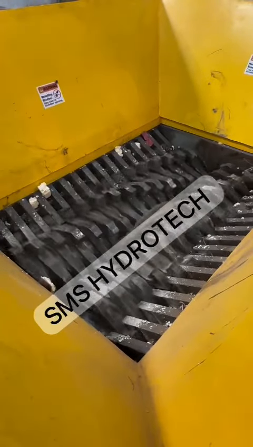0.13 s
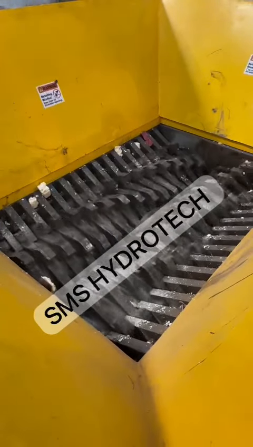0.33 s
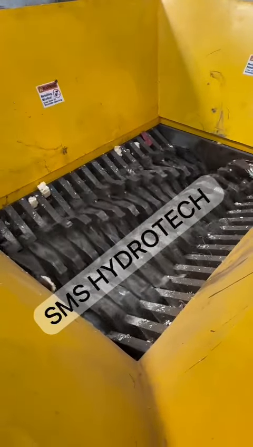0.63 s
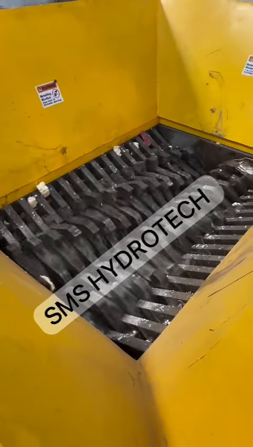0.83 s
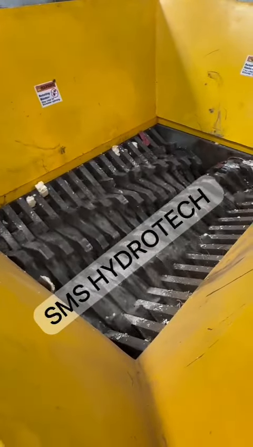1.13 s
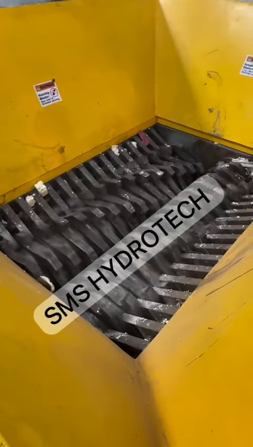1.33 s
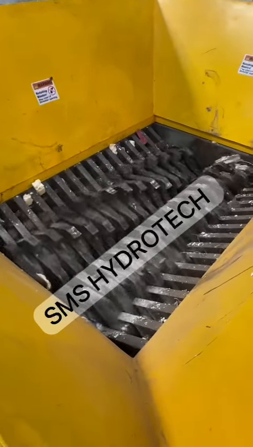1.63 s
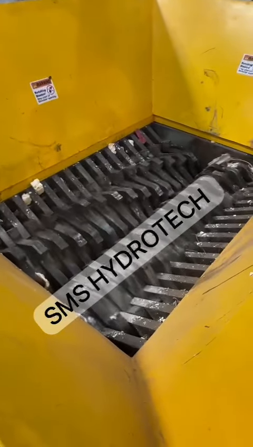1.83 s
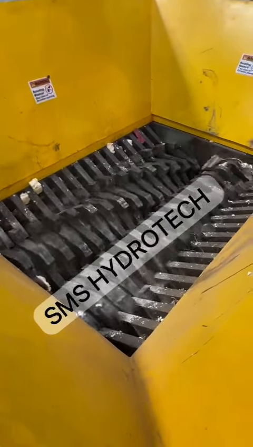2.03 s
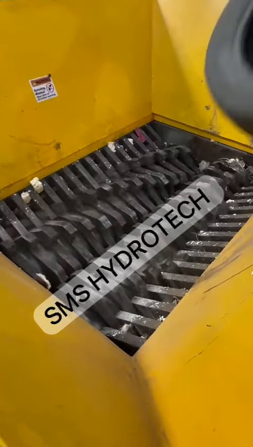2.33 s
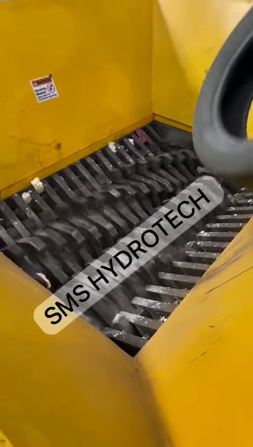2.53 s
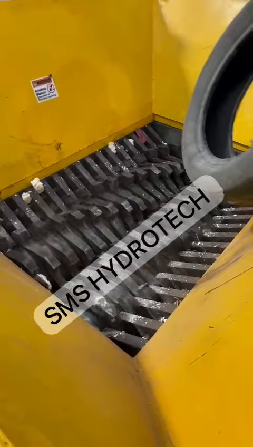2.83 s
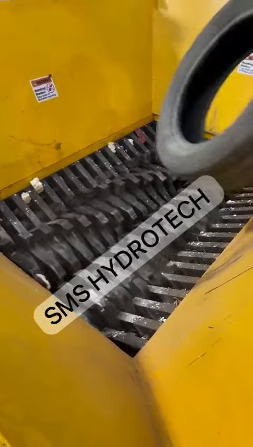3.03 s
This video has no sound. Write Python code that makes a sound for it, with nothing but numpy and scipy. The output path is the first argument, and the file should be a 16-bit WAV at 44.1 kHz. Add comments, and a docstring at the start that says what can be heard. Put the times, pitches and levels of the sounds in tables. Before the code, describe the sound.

A large industrial shredder hums and roars low throughout, with dull thuds. From 0 to about 0.85 s its blades crunch scrap in dense cracks and bright snaps. It then runs nearly empty, grinding crumbs, with a brief crack near 1.3 s, loose ringing rattles and tiny squeaks. From about 2.6 s to 3.2 s, hooks knock, scrape and rattle on a tyre. Close stereo pickup, short steel-hopper echoes, dulled extreme treble.

```python
"""Twin-shaft shredder in a steel hopper

At the bottom of the hopper the drive hums in gear tones and its noise roar throbs once a turn, with low thuds.
Blades crunch a last scrap, in noise, cracks and snaps, then run nearly empty, grinding on random crumbs.
Squeaks and bouncing bits pass by; then hooks knock and rattle on a tyre, in blows, gritty judder and rings.
The steel walls answer the cutters with dense echoes, and a two-port stereo microphone takes it all in."""
import sys
import numpy as np
from scipy import signal
from scipy.fft import rfft, irfft, next_fast_len
from scipy.io import wavfile

SR = 44100
rng = np.random.default_rng(int(sys.argv[2]) if len(sys.argv) > 2 else 0)


def pcm_store(signal):
    """Save signal as 16-bit PCM."""
    levels = np.round(np.clip(np.atleast_2d(signal), -1, 1) * 32767)
    wavfile.write(sys.argv[1], SR, levels.astype(np.int16).T)


N = 140679
T = np.arange(N) / SR
SIZE = 2 * next_fast_len(N * 5 // 8)  # transform length, with room beyond the end of the sound
HZ = np.arange(SIZE // 2 + 1) * SR / SIZE


def from_db(db):
    """Decibels to gain."""
    return 10 ** (np.asarray(db) / 20)


def rms_one(x):
    """Scale to rms 1."""
    return x / np.sqrt(np.mean(x ** 2) + 1e-20)


def in_time(rows):
    """Each column of a table after the first, joined over time."""
    start_s, *columns = np.transpose(rows)
    return [np.interp(T, start_s, column) for column in columns]


def over_hz(points):
    """A table joined on a log-frequency axis."""
    hz, value = np.transpose(points)
    return np.interp(np.log(HZ + 1), np.log(hz), value)


def drift(rate_hz):
    """Smooth chance with rms 1: noise whose spectrum falls away above the rate."""
    spectrum = rfft(rng.standard_normal(SIZE)) / (1 + (HZ / rate_hz) ** 2)
    return rms_one(irfft(spectrum)[:N])


def colour(x, spectrum):
    """Causal (minimum-phase) filter of the given shape that keeps the power of white noise."""
    cepstrum = irfft(np.log(rms_one(from_db(over_hz(spectrum)))))
    # Folding the cepstrum onto positive time makes the filter causal.
    cepstrum[1:SIZE // 2] *= 2
    cepstrum[SIZE // 2 + 1:] = 0
    response = np.exp(rfft(cepstrum))
    return irfft(rfft(x, SIZE) * response)[:N]


def grains(per_s, spread_db):
    """Random tiny fractures of uneven size and either sign; rms 1."""
    size_db = spread_db * np.minimum(rng.exponential(1, N), 4)
    sizes = from_db(size_db) * rng.choice([-1, 1], N)
    return rms_one(sizes * (rng.random(N) < per_s / SR))


def dying(start_s, t60_s):
    """An envelope that jumps to 1, falls 60 dB in t60_s and stops after twice that time."""
    out = np.zeros(N)
    span = slice(int(start_s * SR), int((start_s + 2 * t60_s) * SR))
    out[span] = from_db(-60 * (T[span] - start_s) / t60_s)
    return out


def swell(start_s, t60_s, rise_s):
    """An envelope that builds from nothing and dies away: a slow decay minus a fast one."""
    return dying(start_s, t60_s) - dying(start_s, rise_s)


def bursts(rows, t60_s):
    """Each contact is a very short run of tiny slips of random sign that builds and dies."""
    rise_s = 0.0034
    envelope = sum(from_db(level_db) * swell(start_s, t60_s, rise_s) for start_s, level_db, *_ in rows)
    return envelope * rng.choice([-1, 1], N)


def patchy(x, depth_db):
    """Contact points shift, so each half octave swells and fades on its own; the top band holds steady."""
    spectrum = rfft(x, SIZE)
    place = np.clip(2 * np.log2((HZ + 1) / 400), 0, 7)  # half octaves above 400 Hz
    bands = [irfft(spectrum * np.maximum(1 - abs(place - k), 0))[:N] for k in range(8)]
    return sum(band * from_db(depth_db * drift(45)) for band in bands[:-1]) + bands[-1]


def chips(per_s, spread_db):
    """Small fragments hit the steel at random, each with a short ring of one of 18 pitches; rms 1."""
    pitches = np.geomspace(575, 2490, num=18)  # Hz
    ring_cycles = 37  # cycles to fall 60 dB
    hits = grains(per_s, spread_db)
    dealt = rng.integers(0, len(pitches), N)
    out = 0
    for k, hz in enumerate(pitches):
        r = from_db(-60 * hz / (ring_cycles * SR))  # decay per sample
        w = 2 * np.pi * hz / SR
        struck = hits * (dealt == k) + 1e-18
        out = out + signal.lfilter([1, -r * np.cos(w)], [1, -2 * r * np.cos(w), r * r], struck)
    return rms_one(out)


# Modes of a struck piece. Columns: pitch_ratio [multiple of its pitch], level_db [dB]
PIECE_MODES = [(.61, -7), (.83, -10.5), (1, 0.5), (1.14, -9.5), (1.33, -10)]


def pieces(rows, t60_s):
    """Struck pieces ring briefly in a few modes around their pitch, swinging in alternate directions."""
    out = np.zeros(N)
    for start_s, level_db, *_, pitch_hz in rows:
        start = int(start_s * SR)
        t = T[:min(int(2 * t60_s * SR), N - start)]
        ring = 0
        for k, (pitch_ratio, mode_db) in enumerate(PIECE_MODES):
            ring = ring + (-1) ** k * from_db(mode_db) * np.sin(2 * np.pi * pitch_hz * pitch_ratio * t)
        out[start:start + len(t)] += from_db(level_db - 60 * t / t60_s) * ring
    return out


# Gear lines of the drive. Columns: multiple [of the turning rate], level_db [dB, before wavering]
HUM_LINES = [(2, -53), (3, -43), (4, -37.5), (5, -36.5), (7, -37), (8, -36.5), (10, -35.5), (11, -40.5),
             (12, -36), (14, -40.5), (15, -46), (16, -37.5), (17, -39.5), (18, -43), (24, -46), (35, -48)]
# Load on the frame, before the roar trim. Columns: start_s [s], level_db [dB]
ROAR_LOAD = [(0, -23.5), (.45, -25.5), (.8, -28), (1.05, -27.5), (1.28, -25), (1.55, -26.5), (1.72, -27.5),
             (1.95, -26), (2.15, -27), (2.42, -28), (2.65, -21.5), (2.85, -24.5), (3.02, -20.5),
             (3.19, -28)]
# Tone of the frame's roar, relative. Columns: freq_hz [Hz], level_db [dB per Hz]
ROAR_SPECTRUM = [(15, -51), (28, -36), (42, -25), (60, -12.5), (78, 0), (105, -2.5), (145, -1.5), (200, -6),
                 (275, -2.5), (350, -10), (600, -19.5), (1500, -28), (5000, -92)]


def drive():
    """Gear lines waver in level and phase over a roar that throbs once a turn; stereo."""
    turn = 2 * np.pi * 16.92 * T  # turning rate in Hz
    waver_db, wander_rad = -1, 0.14
    trim_db, throb_db, side_db = -2.5, -1, -27
    load_db, = in_time(ROAR_LOAD)
    hum = 0
    for multiple, level_db in HUM_LINES:
        gain = from_db(level_db + waver_db * np.tanh(drift(4)))
        phase = rng.uniform(0, 2 * np.pi) + wander_rad * drift(5.8)
        hum = hum + gain * np.sin(round(multiple) * turn + phase)
    mid, side = (rms_one(colour(rng.standard_normal(N), ROAR_SPECTRUM)) for _ in range(2))
    roar = mid + from_db(side_db) * side * [[1], [-1]]
    return hum + roar * from_db(trim_db + load_db + throb_db * np.sin(turn))


# The frame thuds as a blade bites. Columns: start_s [s], level_db [dB], pitch_hz [Hz]
THUDS = [(0.304, -17, 90), (0.372, -19, 109), (.452, -12.5, 73), (1.378, -14, 76.5), (1.82, -13.5, 99),
         (1.914, -14.5, 106), (2.005, -14.5, 140), (2.281, -14.5, 141), (2.993, -16, 217),
         (3.134, -10.5, 84)]


def thuds():
    """Short low swings of the frame that take a moment to build."""
    t60_s, rise_s = 0.12, 0.022
    out = 0
    for start_s, level_db, pitch_hz in THUDS:
        swing = np.sin(2 * np.pi * pitch_hz * (T - start_s))
        out = out + from_db(level_db) * swell(start_s, t60_s, rise_s) * swing
    return out


# Blades grinding on crumbs, before trims. Columns: start_s [s], level_db [dB]
GRIND_LEVEL = [(0, -30.5), (.75, -31), (.9, -34.5), (1.03, -33), (1.24, -30), (1.42, -32), (1.72, -35),
               (2.1, -31.5), (2.4, -33.5), (2.56, -32.5), (2.65, -31), (2.78, -32), (2.87, -29),
               (3.06, -30), (3.19, -25.5)]
# Tone of the grinding, relative. Columns: freq_hz [Hz], level_db [dB per Hz]
GRIND_SPECTRUM = [(150, -12.5), (400, 2), (800, -1), (1200, -4), (1800, -5), (2500, -5.5), (3400, -9),
                  (4900, -13.5), (6200, -12), (7500, -16), (8900, -16), (10200, -27.5), (11300, -32.5)]


def grinding():
    """Crumbs rub and clatter between the cutter discs; now and then a larger one pops."""
    level_db, = in_time(GRIND_LEVEL)
    pops = from_db(-11) * grains(per_s=70, spread_db=-0.5)
    rub = grains(per_s=5000, spread_db=1.5) + pops
    clumped = rub * from_db(level_db - 1.21 + 1.4 * drift(38))
    clatter = from_db(level_db - 11.5) * chips(per_s=110, spread_db=0.5)
    return patchy(colour(clumped, GRIND_SPECTRUM) + clatter, depth_db=2.5)


# Scraps squeal between the discs, before the trim.
# Columns: middle_s [s], level_db [dB], pitch_hz [Hz], length_s [s]
SQUEAKS = [(1.225, -31, 1080, .04), (1.361, -33.5, 1856, 0.036), (1.601, -37.5, 2400, 0.081),
           (2.109, -30, 1228, 0.021), (2.271, -35.5, 2240, 0.017), (2.347, -39, 2680, 0.018),
           (2.597, -28.5, 1453, 0.027), (2.658, -33.5, 2280, .08), (3.013, -31, 6510, 0.0092),
           (3.039, -28.5, 1825, 0.02), (3.117, -32.5, 2354, 0.032)]


def squeaks():
    """Stick and slip gives a short rough tone that swells and fades."""
    trim_db = 2
    wobble_hz = 92.55 * drift(228.3)  # fast pitch wander that roughens the tone
    out = 0
    for middle_s, level_db, pitch_hz, length_s in SQUEAKS:
        envelope = np.exp(-np.minimum((2 * (T - middle_s) / length_s) ** 2, 50))
        tone = np.sin(2 * np.pi * np.cumsum(pitch_hz + wobble_hz) / SR)
        out = out + from_db(level_db + trim_db) * envelope * tone
    return out


# Loose bits land on the blades, before the trim. Columns: start_s [s], level_db [dB], pitch_hz [Hz]
RATTLES = [(1.053, -22.5, 1145), (1.107, -22, 686), (1.157, -34, 1750), (1.213, -21, 790),
           (1.258, -22, 630), (1.565, -25, 710), (1.703, -27, 1020), (1.739, -25, 1350), (1.769, -28, 930),
           (1.884, -23, 1006), (1.964, -23.5, 1460), (1.982, -21, 810), (2.132, -19.5, 1110),
           (2.202, -32, 755), (2.56, -26, 900)]


def rattles():
    """A loose bit lands, rings and bounces once, more weakly."""
    bounces = []
    for start_s, level_db, pitch_hz in RATTLES:
        gap_s = 0.011 * rng.uniform(0.623, 1.4)
        bounces.append((start_s + gap_s, level_db - 14, pitch_hz))
    return from_db(-3) * pieces(list(RATTLES) + bounces, t60_s=0.04)


# The scrap being crushed, before trims. Columns: start_s [s], crunch_db [dB], crackle_db [dB]
CRUSH_LEVEL = [(0, -21.5, -28.5), (.1, -28, -29.5), (.155, -24.5, -27), (.18, -21, -26), (.205, -23, -25.5),
               (.24, -21.5, -24), (.29, -21.5, -28), (.34, -25, -29), (.41, -29, -32), (.49, -24, -28),
               (.57, -27.5, -36), (.605, -33, -23.5), (.63, -27.5, -30), (.69, -26, -27), (.77, -30.5, -35),
               (.84, -34, -32.5), (.9, -56, -70)]
# Tone of the crunch, relative. Columns: freq_hz [Hz], level_db [dB per Hz]
CRUNCH_SPECTRUM = [(100, -16), (350, -6), (650, 1), (1200, 1.5), (2100, 2.5), (3100, -15), (4500, -19),
                   (10000, -64)]
# Tone of the fine crackle, relative. Columns: freq_hz [Hz], level_db [dB per Hz]
CRACKLE_SPECTRUM = [(1000, -6.5), (3000, -10), (3800, -2.5), (4800, -5), (5900, 1.5), (7400, -3.5),
                    (8900, -1), (10200, -6), (11300, -14.5)]
# The scrap cracks, before trims. Columns: start_s [s], level_db [dB], pitch_hz [Hz, of the breaking piece]
CRACKS = [(.134, -14.5, 1880), (.164, -12, 1300), (.167, -9, 870), (0.173, -11, 1200), (.178, -13.5, 2060),
          (.185, -12, 1130), (.221, -17, 1060), (0.237, -12, 1590), (.262, -4, 2060), (.2646, -10, 1650),
          (.2755, -2.5, 1910), (.278, -14.5, 1310), (.282, -4.5, 658), (0.2925, -9.5, 1830),
          (0.3127, -10, 1920), (0.3543, -5, 1650), (.356, -11, 1085), (0.373, -10, 630),
          (.407, -15.5, 1460), (.439, -12.5, 1100), (0.478, -12, 1480), (.485, -9.5, 1200),
          (.493, -22, 830), (0.5001, -10, 1850), (.522, -15.5, 594), (.557, -13.5, 1065), (.589, -16, 1210),
          (.631, -22, 620), (0.672, -12.5, 1170), (.692, -14.5, 1240), (.716, -15.5, 1000),
          (1.285, -15, 1680)]
# Tone of a crack, relative. Columns: freq_hz [Hz], level_db [dB per Hz]
CRACK_SPECTRUM = [(100, -14), (350, 4.5), (600, 1.5), (1000, 2.5), (1500, 5.5), (2050, 1), (2900, -7.5),
                  (4500, -9), (6000, -7.5), (9000, -43), (11000, -41)]
# Sharp snaps at the cutting edges, before the trim. Columns: start_s [s], level_db [dB]
SNAPS = [(.031, -27), (.137, -24), (.166, -18), (.204, -24), (.252, -19), (.263, -4), (.388, -15),
         (.438, -7), (.4732, -10), (.4997, -9), (.521, -12), (.523, -2.5), (.550, -5), (.5868, -5),
         (.761, -11), (.771, -23), (.786, -28), (.796, -11), (.821, -11), (.829, -18), (.843, -34),
         (.856, -33), (1.285, -18), (1.289, -11), (2.315, -19), (2.600, -21), (2.817, -28)]
# Tone of a snap, relative. Columns: freq_hz [Hz], level_db [dB per Hz]
SNAP_SPECTRUM = [(1000, -17), (3500, -7), (4700, -6), (5900, 4), (7000, -2.5), (8800, -8), (11300, -9.5)]


def scrap():
    """Clumps of fractures and flying chips, with single cracks and snaps standing out."""
    crunch_db, crackle_db = in_time(CRUSH_LEVEL)
    clumps = drift(58)  # crunch and crackle swell together
    fractures = grains(per_s=1800, spread_db=1) * from_db(crunch_db - 4.5 + 1.6 * clumps)
    crunch = patchy(colour(fractures, CRUNCH_SPECTRUM), depth_db=1.5)
    flying = from_db(crunch_db - 9) * chips(per_s=450, spread_db=2)
    flicker_db = 2 * clumps + 2.8 * drift(130)
    fine = grains(per_s=3000, spread_db=2.0) * from_db(crackle_db - 0.8 + flicker_db)
    crackle = colour(fine, CRACKLE_SPECTRUM)
    cracks = from_db(-5) * colour(bursts(CRACKS, t60_s=0.013), CRACK_SPECTRUM)
    rings = from_db(-4) * pieces(CRACKS, t60_s=0.026)
    snaps = from_db(-1.5) * colour(bursts(SNAPS, t60_s=0.0086), SNAP_SPECTRUM)
    return crunch + flying + crackle + cracks + rings + snaps


# Hooks knock and scrape on rubber, before trims.
# Columns: start_s [s], level_db [dB], hold_s [s], release_s [s, to fall 60 dB], pitch_hz [Hz, of the blow]
KNOCKS = [(2.097, -28, .018, 0.1, 1290), (2.202, -26, 0.01, 0.023, 800), (2.577, -20.5, 0.015, 0.05, 1010),
          (2.597, -23.5, 0.027, .04, 1640), (2.65, -25.5, .018, .1, 2285), (2.717, -26.5, 0.005, 0.22, 833),
          (2.815, -18, 0.015, 0.092, 1317), (2.847, -25, .006, 0.07, 624), (2.864, -23, 0.013, 0.054, 1920),
          (2.891, -24.5, 0.0088, 0.063, 850), (2.9856, -16.5, 0.0053, 0.03, 1135),
          (2.998, -20, 0.0054, 0.062, 1746), (3.019, -29, .006, .07, 1200), (3.106, -19, 0.017, 0.14, 2280),
          (3.146, -25.5, 0.0054, 0.047, 630), (3.175, -32, 0.012, .15, 2750)]
# Tone of landing and judder, relative. Columns: freq_hz [Hz], level_db [dB per Hz]
KNOCK_SPECTRUM = [(100, 4.5), (350, -8.5), (600, 4), (1100, -1.5), (2400, 2.5), (3100, -12), (4900, -9),
                  (6500, -7.5), (7600, -16), (8900, -15), (10200, -18), (11300, -29)]


def knocks():
    """Each hook lands with a short ringing blow, judders grittily along the rubber and slips off."""
    trim_db = -3.5
    force = 0
    for start_s, level_db, hold_s, release_s, _ in KNOCKS:
        held = (T >= start_s) * (T < start_s + hold_s)
        contact = held + dying(start_s + hold_s, release_s)
        force = force + from_db(level_db + trim_db) * contact
    judder = force * grains(per_s=3500, spread_db=2.6) * from_db(0.94 * drift(65) - 1.5)
    dull = signal.butter(2, 2600, fs=SR, output="sos")  # low-pass, Hz
    landing = from_db(-2) * signal.sosfilt(dull, bursts(KNOCKS, t60_s=0.031))
    grit = force * from_db(-7) * chips(per_s=600, spread_db=0.0)
    rings = from_db(-1) * pieces(KNOCKS, t60_s=0.06)
    return colour(judder + landing, KNOCK_SPECTRUM) + grit + rings


def cutters():
    """All the crushing between the blades: grinding, scrap and hooks."""
    return grinding() + scrap() + knocks()


def echoes(x, t60_s):
    """Dense reflections between steel walls: a dying noise tail of unit energy."""
    tail = rng.standard_normal(N) * dying(.001, t60_s)
    return signal.fftconvolve(x, tail / np.linalg.norm(tail))[:N]


# Likeness of left and right. Columns: freq_hz [Hz], likeness [0-1]
LIKENESS = [(100, .995), (500, 0.97), (800, 0.86), (1600, 1), (2100, 0.99), (2600, 0.82), (3300, 0.22),
            (4500, 0), (5300, 0.1), (5900, 1), (7000, 1), (9000, 0.73), (10200, 1)]


def scene():
    """The cutters echo in the hopper; a diffuse share of their noise widens the treble."""
    direct = cutters() + squeaks() + rattles()
    x = thuds() + direct + from_db(-11) * echoes(direct, t60_s=0.18)
    alike = np.clip(over_hz(LIKENESS), 0, .999)
    mid = rfft(x, SIZE) * np.sqrt((1 + alike) / 2)
    # A second, independent draw of the cutters, a quarter cycle turned, is the diffuse part.
    side = 1j * rfft(cutters(), SIZE) * np.sqrt((1 - alike) / 2)
    return drive() + irfft(np.array([mid + side, mid - side]))[:, :N]


# Phase by which the left port leads. Columns: freq_hz [Hz], lead_rad [rad]
PORT_LEAD = [(2800, 0), (3900, 1.7), (4500, -3), (5200, 0.5), (5900, 0.37), (7200, 1.5), (8000, 1.62),
             (9000, 1.98), (10000, 3.5), (11500, 3.5)]
# Level of the left port over the right. Columns: freq_hz [Hz], level_db [dB]
PORT_BALANCE = [(60, -1.5), (150, -0.8), (480, -3.5), (1000, -2), (2000, 0), (8000, -0.1)]


def record(dry):
    """Two microphone ports differ in level and phase; the highest peaks are rounded and the top is cut."""
    halves = np.array([[.5], [-.5]])  # each port takes half the difference
    ports = from_db(over_hz(PORT_BALANCE) * halves) * np.exp(1j * over_hz(PORT_LEAD) * halves)
    x = irfft(rfft(dry, SIZE) * ports)[:, :N]
    peak_limit = 1.3
    rounded = x / (1 + (x / peak_limit) ** 4) ** .25
    top_cut = signal.ellip(10, .1, 90, 11400, fs=SR, output="sos")  # low-pass, Hz
    return signal.sosfilt(top_cut, rounded)


dry = scene()
out = record(dry)
pcm_store(out)
```